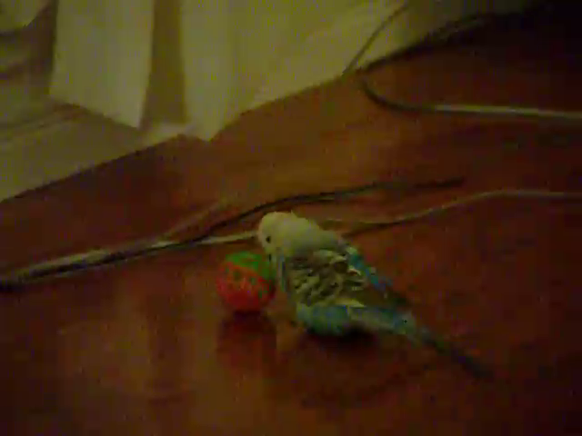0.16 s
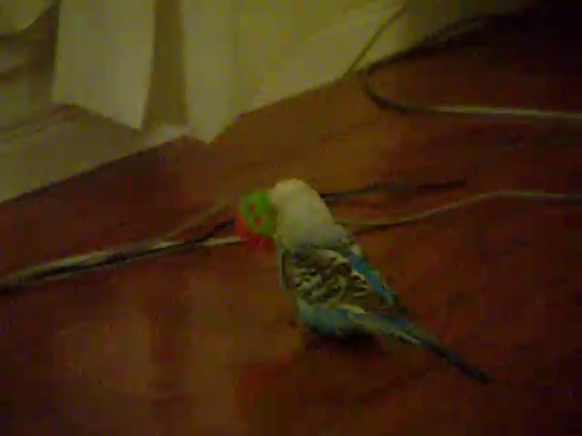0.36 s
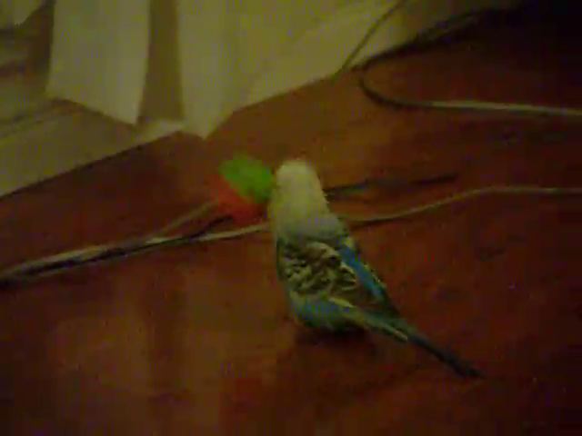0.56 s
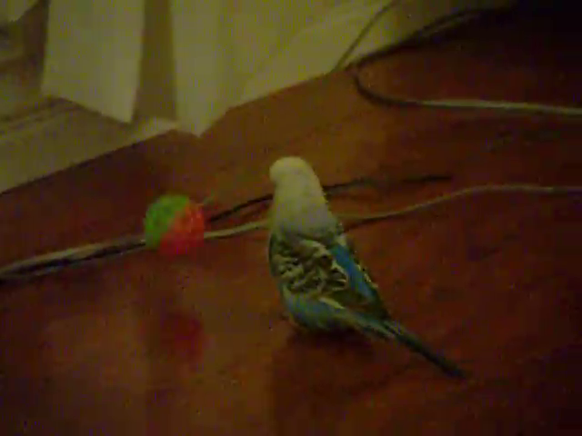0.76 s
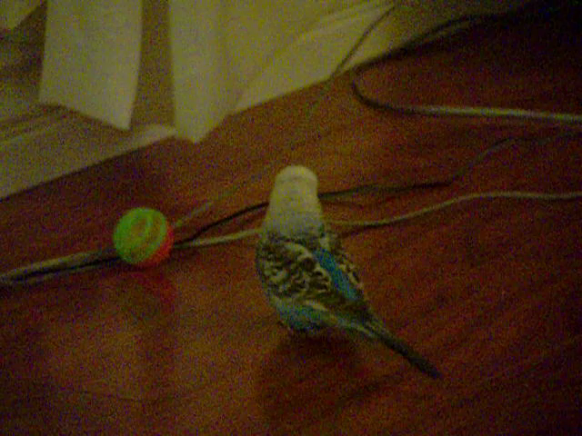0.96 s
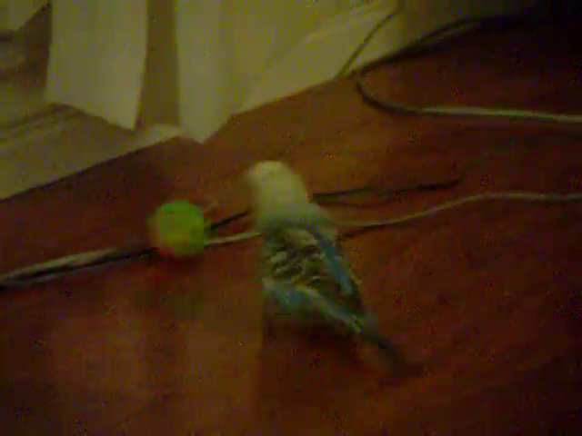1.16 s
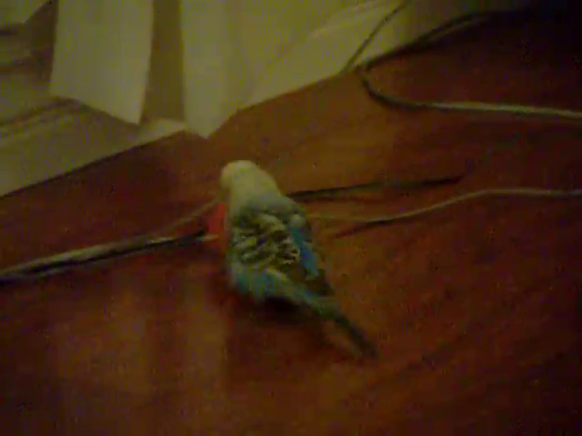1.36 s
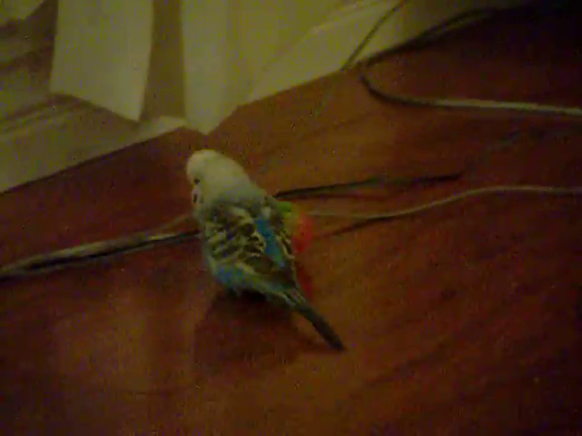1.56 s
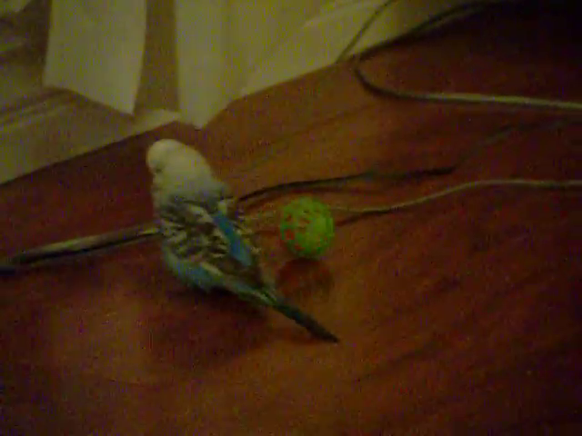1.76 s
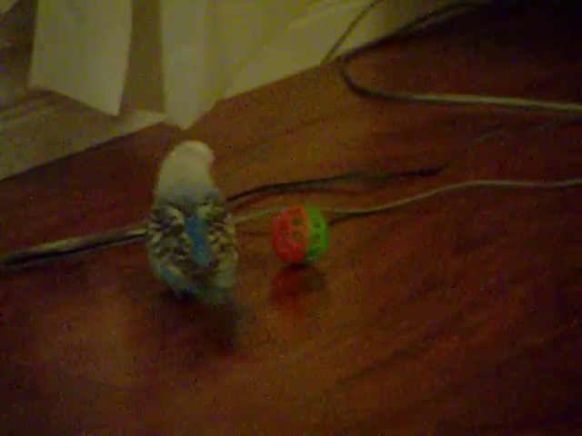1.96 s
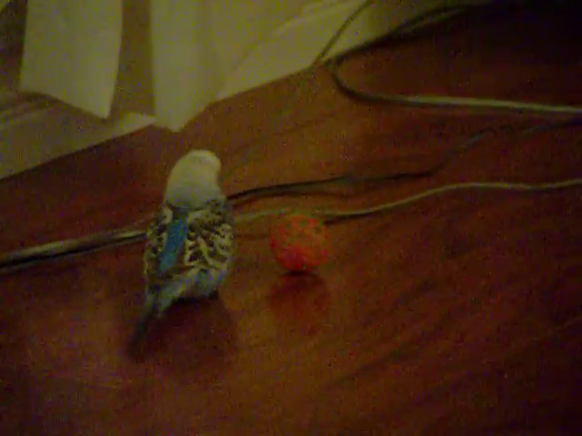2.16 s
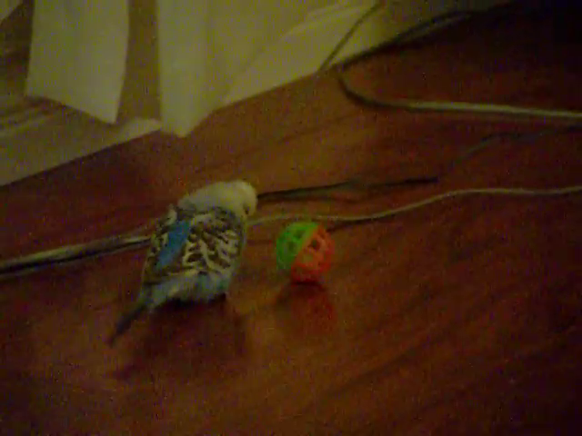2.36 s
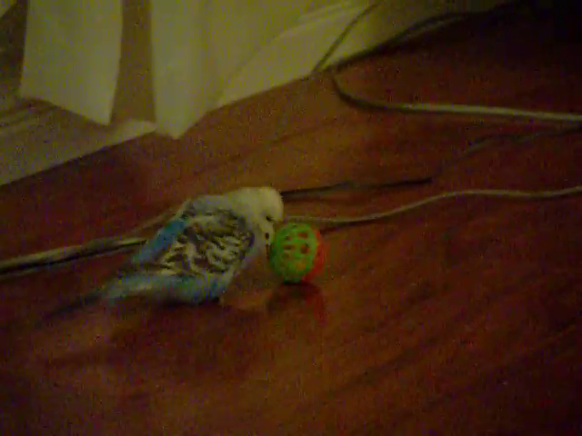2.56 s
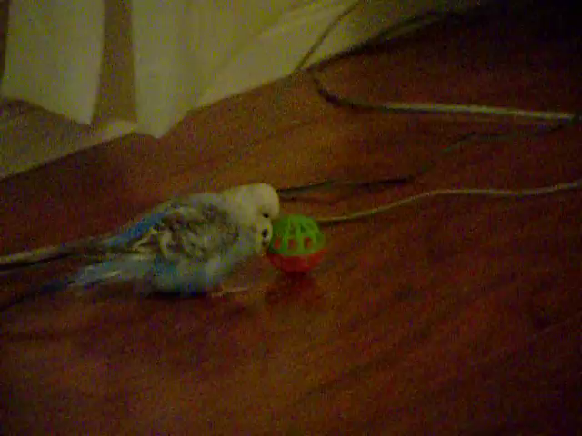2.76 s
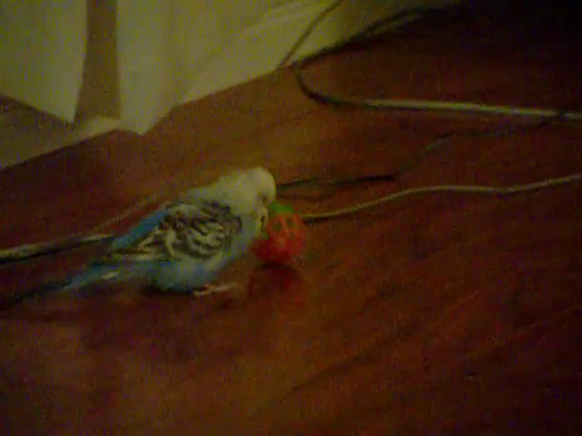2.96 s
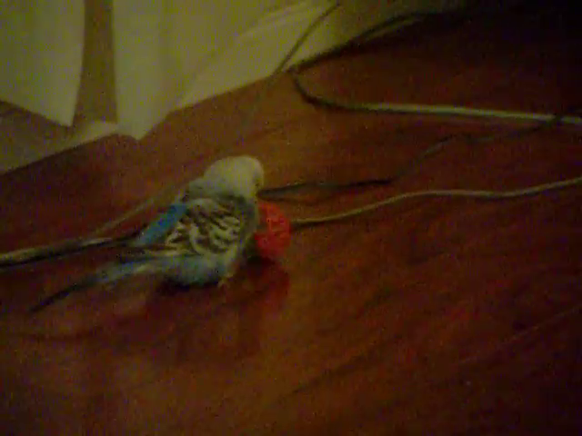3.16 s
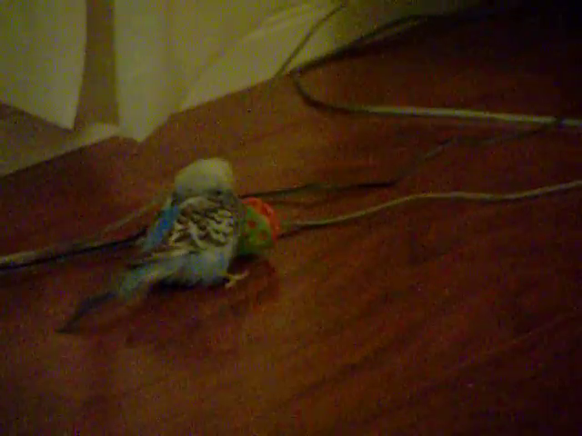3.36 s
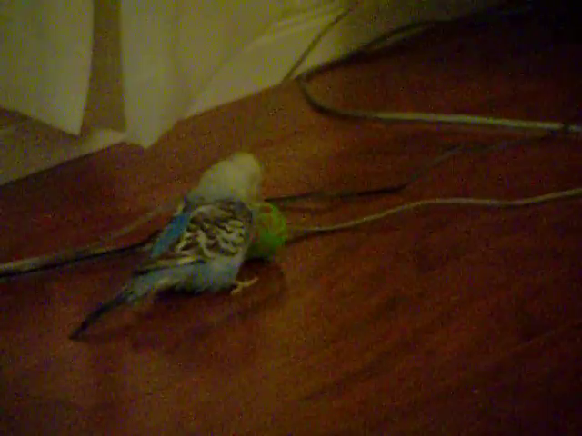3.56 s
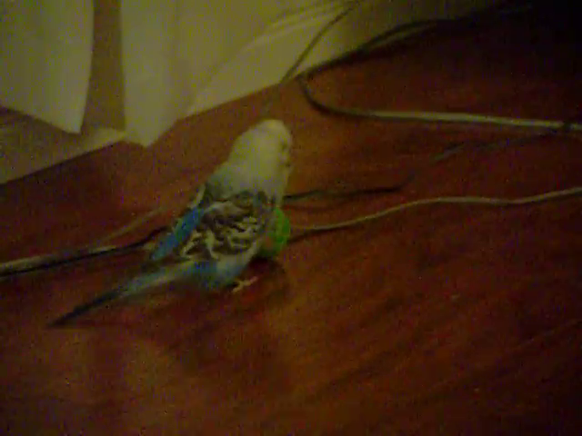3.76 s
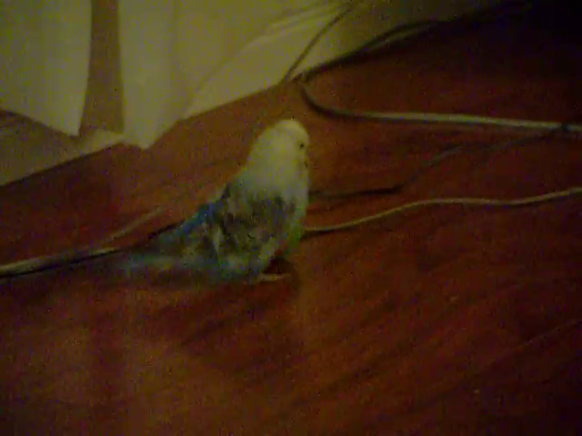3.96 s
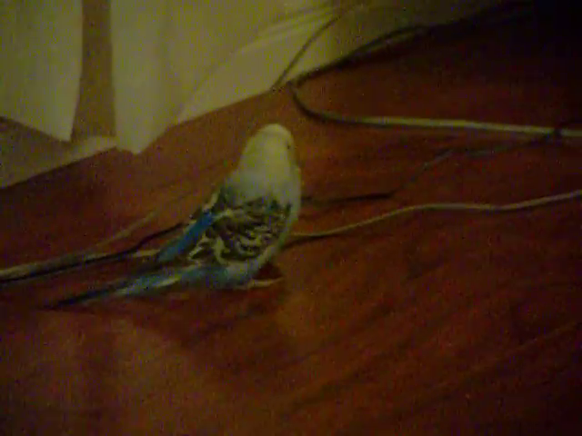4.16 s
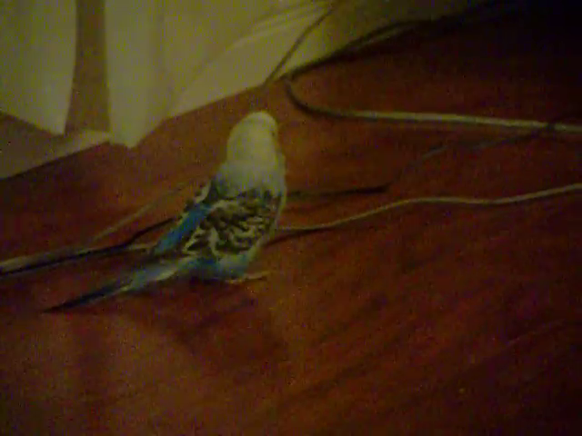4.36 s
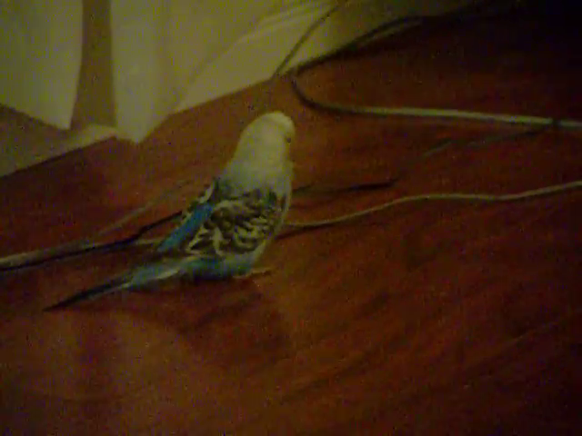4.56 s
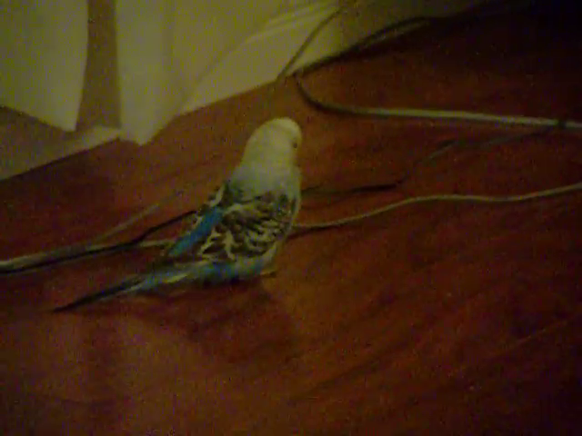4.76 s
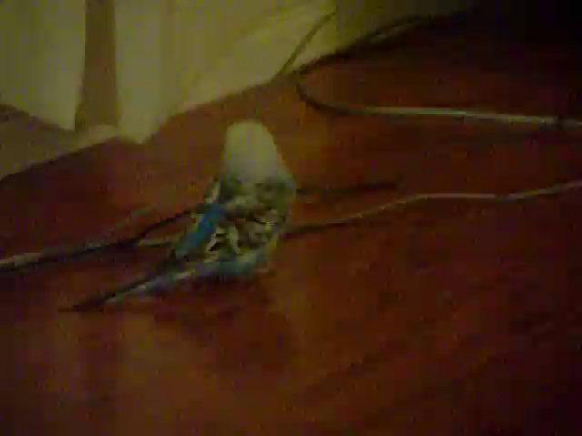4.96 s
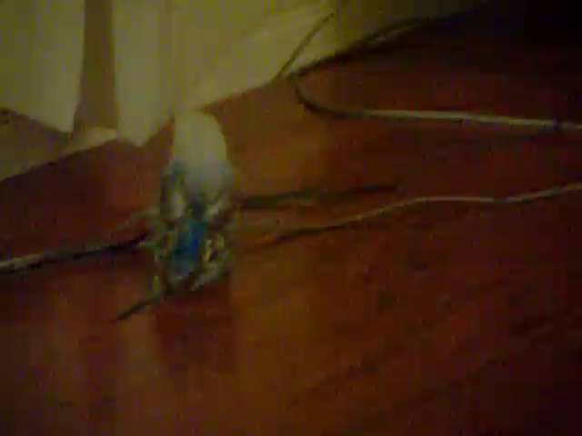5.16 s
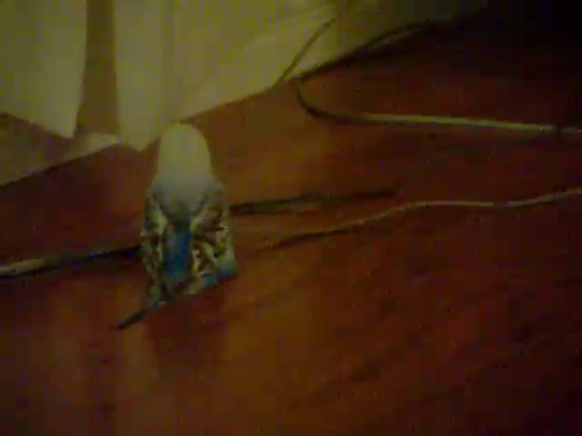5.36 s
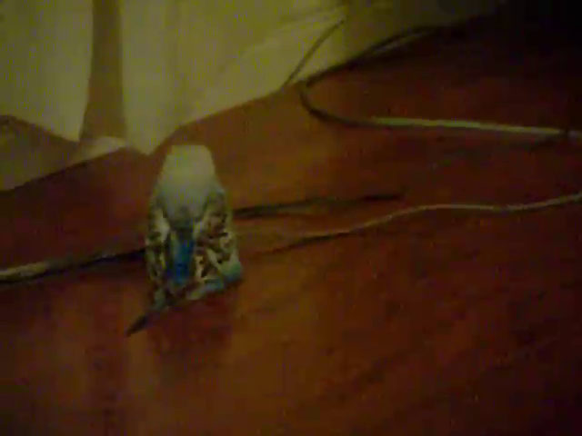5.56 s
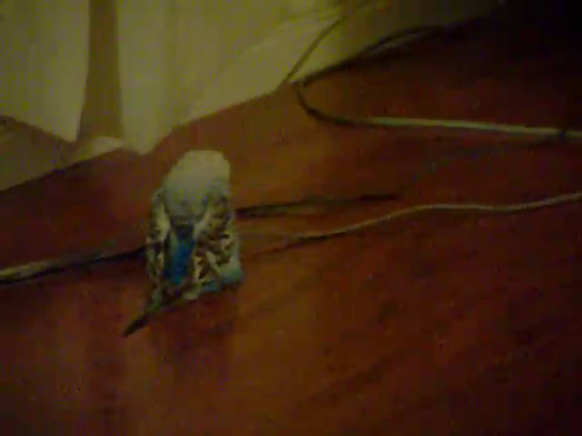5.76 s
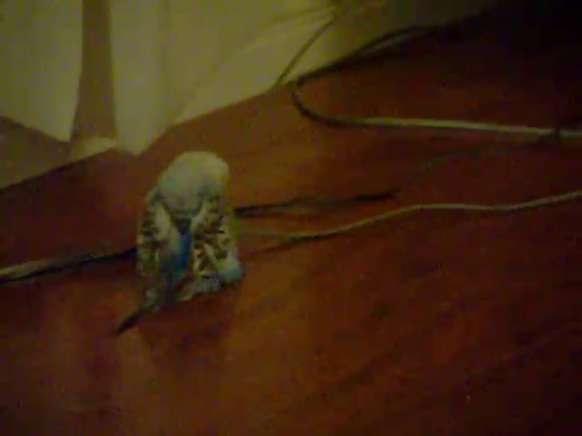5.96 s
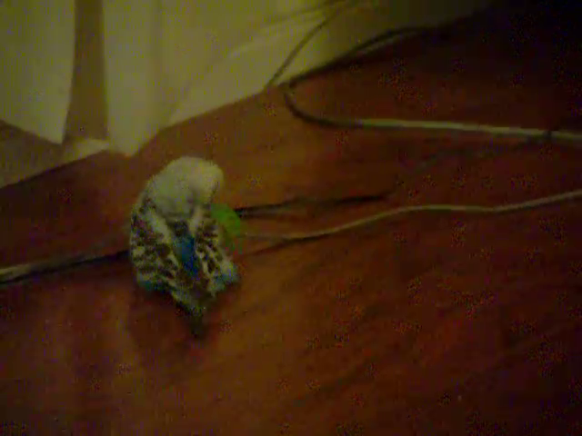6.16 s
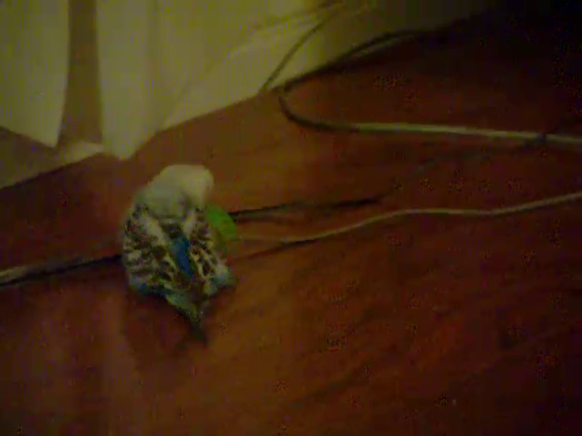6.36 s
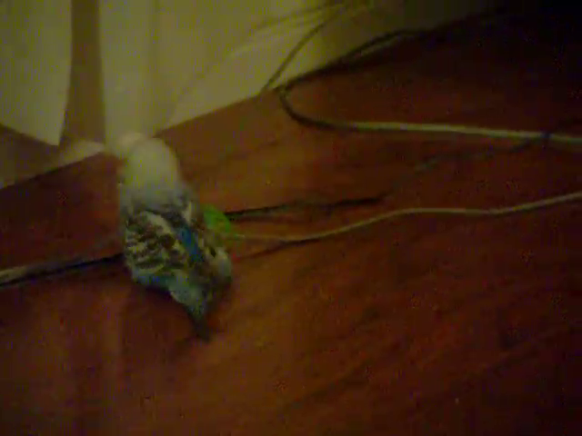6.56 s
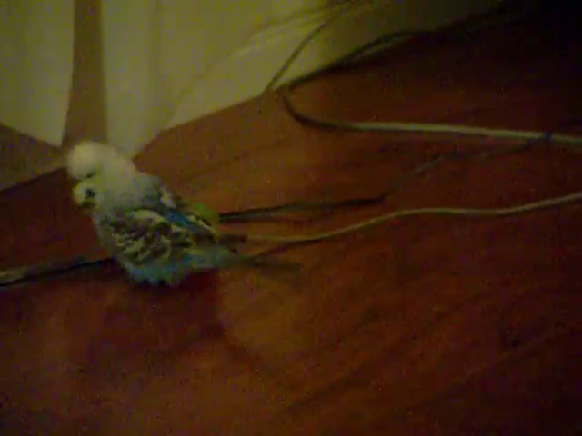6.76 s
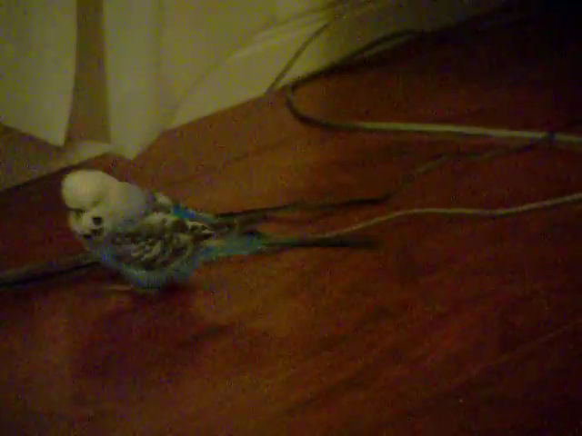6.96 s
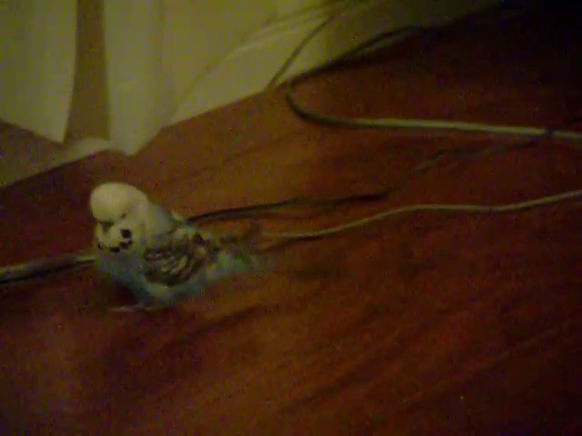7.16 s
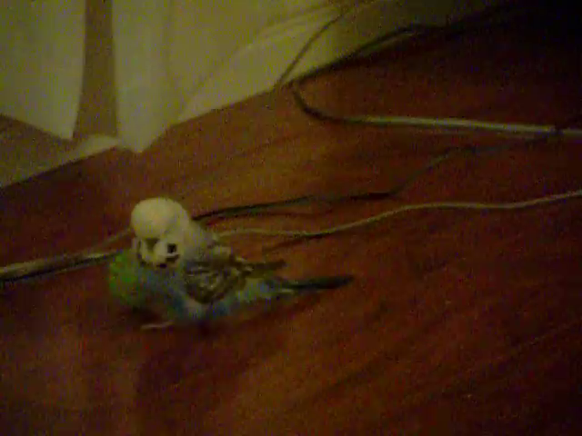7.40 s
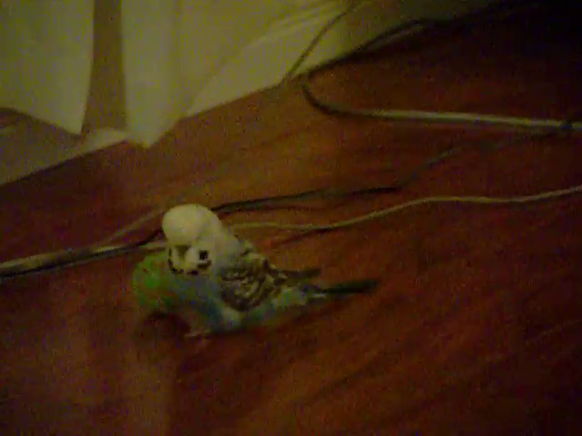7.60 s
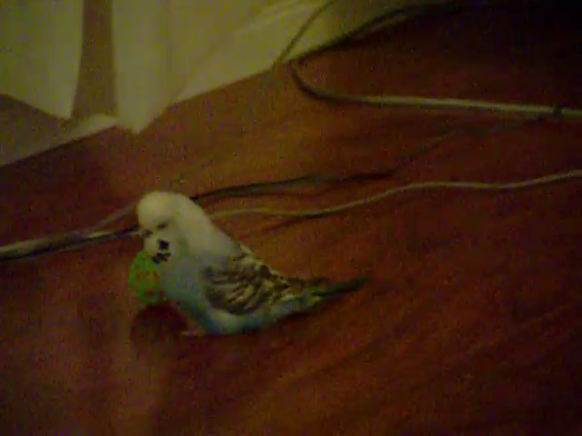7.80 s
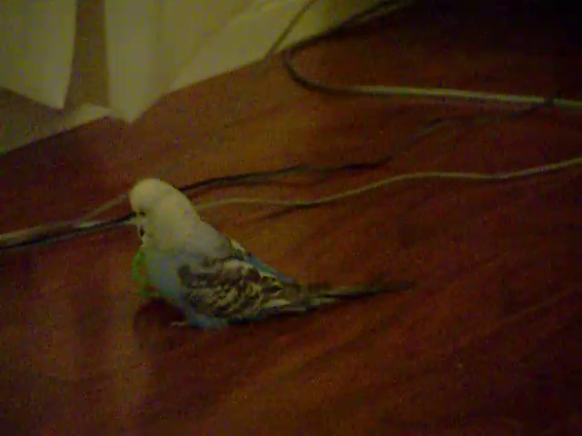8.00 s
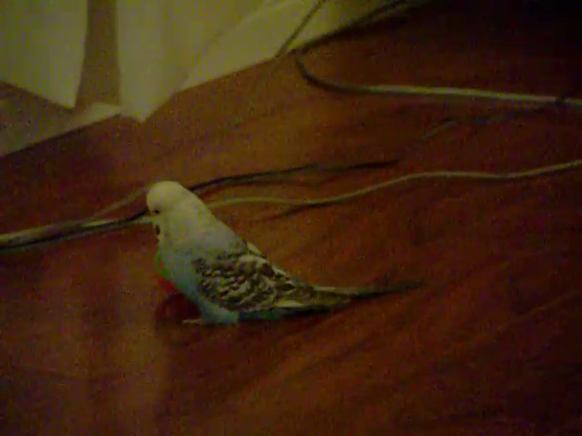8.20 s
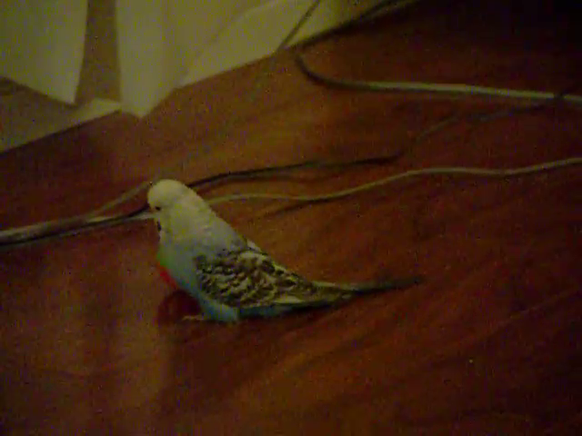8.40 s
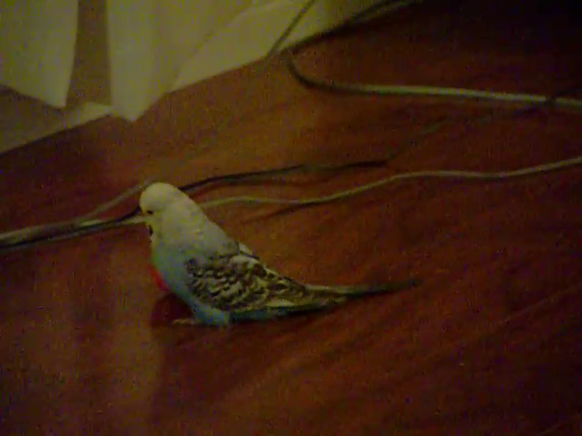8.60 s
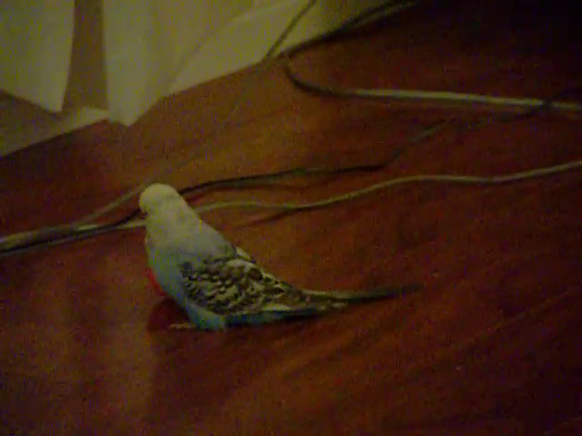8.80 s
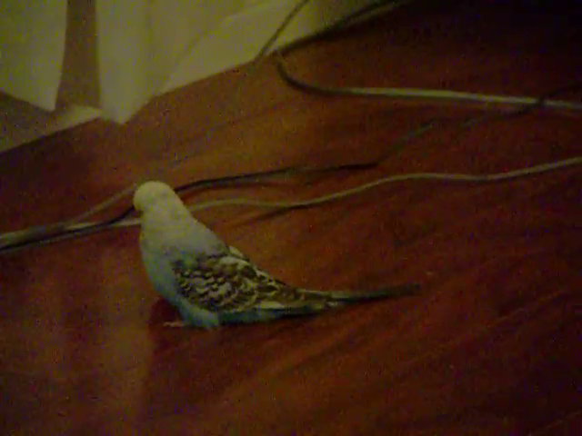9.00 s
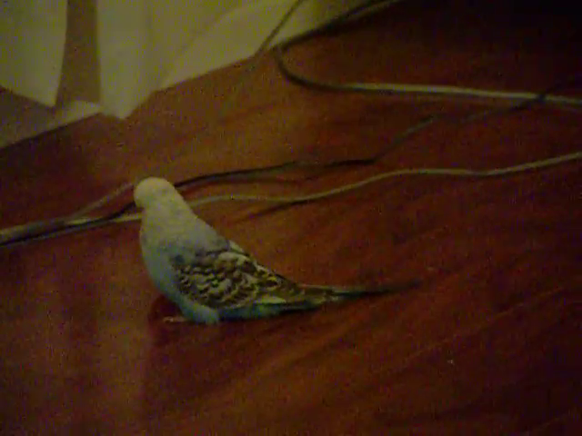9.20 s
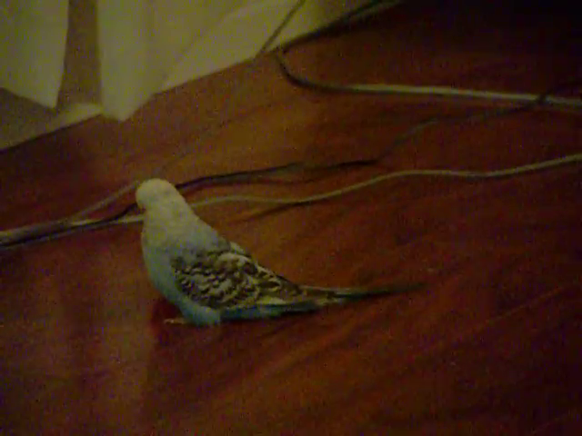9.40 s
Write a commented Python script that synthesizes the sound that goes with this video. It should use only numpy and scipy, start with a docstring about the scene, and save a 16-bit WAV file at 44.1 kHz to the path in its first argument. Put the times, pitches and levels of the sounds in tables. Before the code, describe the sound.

A steady muffled hiss and faint thin whine lie under a small hard-floored room. From 0.2 s, dry beak clicks come, with a quick high chirp at 0.35. At 0.77 a plastic ball lands with a hard wooden knock and its little bell jingles brightly, rolling and ticking until 1.6. Faint tiny warbles follow to 1.95, then scattered taps and soft scuffles. Just before 3 s a short squawk slides down and cracks into roughness; a strong sharp tap follows at 3.2. Low rasps and weak jingles run from 3.5 to 5.8 with light clicks. At 5.9 a piercing, distorted whistle bursts for a tenth of a second, with a thump, and the background ducks briefly. From 6.8 to 8.3 the bell jingles busily among clicks, a soft note at 7.5, and bright taps near 7.95. Afterwards only faint rasps, two taps, a scuffle and a low drone swelling until about 9.4.

```python
"""A small bell jingles in a ball rolling over a wooden floor, while a budgerigar warbles, squawks and whistles loudly.
The bell rings when the slotted plastic ball moves; clicks of the beak and taps of the ball knock the floorboard.
The bird's notes are overtones shaped by its throat. A nearby skirting board and a room tail answer bird and ball.
A small camera adds hiss and a thin whine, and its gain control ducks after loud sounds; a low drone swells at the end."""
import sys
import numpy as np
from scipy import signal
from scipy.fft import rfft, irfft, next_fast_len
from scipy.io import wavfile
from scipy.ndimage import uniform_filter1d, minimum_filter1d, map_coordinates

SR = 44100
rng = np.random.default_rng(int(sys.argv[2]) if len(sys.argv) > 2 else 0)


def master(y):
    """Save y as 16-bit WAV."""
    cut = np.clip(np.atleast_2d(y).T, -1, 1)
    pcm = np.round(cut * 32767)  # scale
    wavfile.write(sys.argv[1], SR, pcm.astype(np.int16))


def elevation(decibels):
    """Turn decibel levels (scalar or array-like) into linear amplitude ratios."""
    levels = np.asarray(decibels, float)
    return 10 ** (levels / 20)


N = 416304
T = np.arange(N) / SR

# ringing modes of the bell, the first six low, the rest high: (pitch [Hz], width [Hz], relative level [dB])
BELL = [(2930, 50, -1), (3465, 45, 0), (4160, 45, -2), (4290, 35, -2), (4650, 50, -2), (5250, 50, -5),
        (5870, 50, -14), (6220, 60, -12), (7545, 45, 0), (7925, 50, -3), (8070, 40, -3), (8450, 45, 0)]
LOW_MODES, HIGH_MODES = BELL[:6], BELL[6:]


def unit(x):
    """Scales a sound to rms 1."""
    return x / np.sqrt(np.mean(x ** 2) + 1e-20)


def along(points, hz):
    """Reads a curve of (Hz, value) points on a log frequency axis."""
    f, v = np.transpose(points)
    return np.interp(np.log(hz + 1), np.log(f + 1), v)


def wobble(rate, size):
    """A smooth random curve with rate knots a second."""
    knots = rng.standard_normal(int(size * rate / SR) + 4)
    return map_coordinates(knots, [np.arange(size) * rate / SR])


def filtered(x, response):
    """Multiplies the spectrum of x by a complex response of frequency."""
    m = next_fast_len(len(x) + 8192)
    spectrum = rfft(x, m) * response(np.fft.rfftfreq(m, 1 / SR))
    return irfft(spectrum, m)[:len(x)]


def mode(hz, width_hz):
    """Response of one resonance: strongest at hz, falling away on both sides."""
    return lambda f: 1j * f * width_hz / (hz * hz - f * f + 1j * f * width_hz)


def fade_60_db(t, seconds):
    """An even fade in dB, as in a freely ringing body: 60 dB in the given seconds."""
    return elevation(-60 * t / seconds)


def add(track, s, sound):
    """Mixes a sound in at time s."""
    part = track[round(s * SR):][:len(sound)]
    part += sound[:len(part)]


def hiss():
    """Steady noise of the camera, coloured by a curve with a narrow notch near the top."""
    # colour of the hiss: (frequency [Hz], relative level [dB])
    hiss_curve = [(13, -26.5), (22, 2), (64, 1.5), (457, -12), (797, -15.5), (881, -16.5), (975, -16),
                  (1050, -14), (1320, -17.5), (4120, -23), (4920, -23.5), (6170, -24.5), (7750, -23.5),
                  (8570, -37.5), (9250, -74.5), (12000, -100), (20400, -120)]
    colour = lambda f: elevation(along(hiss_curve, f)) * (1 - .8 * mode(8050, 350)(f))
    return elevation(-49) * unit(filtered(rng.standard_normal(N), colour))


def whine():
    """Thin steady tones of the camera, each wavering slightly in level and phase."""
    # (pitch [Hz], level [dB])
    whine_tones = [(963.6, -60), (2503, -78.5), (4818, -72.5), (4856, -72)]
    out = np.zeros(N)
    for hz, db in whine_tones:
        level = elevation(db + 1.8 * wobble(12, size=N))
        out += level * np.sin(2 * np.pi * hz * T + 0.56 * wobble(4.4, size=N))
    return out


def drone():
    """A low wavering tone that swells near the end."""
    # swell of the drone: (time [s], level [dB])
    swell = [(6.0, -73), (6.48, -75), (6.68, -54.5), (7.72, -58.5), (8.53, -43.5), (8.81, -47),
             (9.44, -39.5)]
    level = elevation(np.interp(T, *np.transpose(swell)) + 1.5 * wobble(25, size=N))
    return level * np.sin(2 * np.pi * 87 * T + 0.39 * wobble(7.7, size=N))


def room(x):
    """A skirting board echoes after 6 ms; a noise tail dies away, redrawn every quarter second."""
    # how long the tail lasts: (frequency [Hz], time to fall 60 dB [s])
    decay_times = [(300, 0.33), (3000, 0.35), (8000, 0.28)]
    out, hop = np.zeros(N), SR // 4
    fade = np.hanning(2 * hop + 1)[:-1]  # neighbouring pieces overlap
    padded = np.pad(x, (hop, 2 * hop))
    for start in range(0, N + hop, hop):
        hz, t, z = signal.stft(rng.standard_normal(SR // 2), SR, nperseg=256)
        dying = z * fade_60_db(t, along(decay_times, hz)[:, None])
        tail = signal.istft(dying, SR, nperseg=256)[1]
        piece = padded[start:start + 2 * hop] * fade
        wet = signal.fftconvolve(piece, tail / np.linalg.norm(tail))
        add(out, max(start - hop, 0) / SR + .007, wet[max(hop - start, 0):])
    add(out, .006, elevation(-9.5) * x)
    return out


def board(f):
    """Response of the floorboard: a few broad resonances with alternating sign."""
    # (pitch [Hz], width [Hz], level [dB])
    board_modes = [(175, 64, 2), (420, 96, 0), (650, 480, 2.5), (1190, 1270, 0.5)]
    return sum((-1) ** k * elevation(db) * mode(hz, width)(f) for k, (hz, width, db) in enumerate(board_modes))


def taps():
    """Beak clicks and ball taps: a short ring, a bright crack and a board knock, set apart for landings."""
    # clicks and taps: (time [s], level [dB], ring pitch [Hz], crack level over the tap [dB])
    tap_list = [(.168, -30.5, 3840, -16), (0.1844, -33.5, 3770, -26), (0.211, -36.5, 3280, -6.5),
                (0.3267, -28.5, 4640, -19), (0.4367, -29, 4930, -24), (0.5228, -24.5, 4800, -1),
                (.5394, -25.5, 4550, -26), (.7721, -17, 4830, -10), (0.8992, -23.5, 3000, -8),
                (1.0897, -26, 5200, -6), (1.222, -30.5, 2800, 3.5), (1.2836, -28, 2190, 0),
                (1.4171, -27.5, 3480, -20), (1.489, -34, 5030, -18), (1.577, -39, 4260, -4),
                (1.9768, -29, 4600, -12), (2.043, -24, 2630, 1), (2.4197, -32, 2910, -15),
                (2.5898, -28.5, 4960, -6), (2.756, -34, 5050, 7.5), (2.7908, -26, 2470, 8),
                (3.2213, -15, 4000, -11.5), (3.7073, -43.5, 4160, 8.5), (4.0523, -34.5, 4250, -16),
                (4.4187, -34, 4750, 0), (4.974, -43, 6560, 8), (5.072, -37.5, 5470, 5.5),
                (5.1833, -34.5, 2730, -15), (5.303, -31.5, 4760, -10), (5.603, -41, 4600, -8.5),
                (5.6305, -31.5, 2770, -15), (6.159, -36, 2930, 0), (6.6505, -35, 2080, -20),
                (6.8851, -27.5, 3320, -19), (6.9632, -28, 2900, -20), (7.1656, -27, 3000, -15),
                (7.573, -28, 3030, -19), (7.7452, -28.5, 3440, 6), (7.832, -30, 5400, -12),
                (7.9421, -25.5, 6530, 11.5), (7.9692, -24, 6400, -4), (8.8066, -35, 4540, -10),
                (9.2362, -32, 4600, 3)]
    # the ball comes down on the boards: (time [s], blow level [dB])
    landing_list = [(0.5399, -27.5), (0.7717, -8), (.9012, -16.5), (1.222, -26), (2.4182, -27),
                    (2.5885, -32), (2.756, -28), (5.028, -27.5), (5.3039, -43), (8.8062, -29)]
    tap_in_board_db = -13  # share of every tap that reaches the floor
    out, blows, t = np.zeros(N), np.zeros(N), np.arange(SR // 50) / SR
    rise = 1 - np.exp(-t / .0009)
    for s, db, hz, crack_db in tap_list:
        noise = rng.standard_normal((2, len(t))) * rise
        ring = 0.81 * np.sin(2 * np.pi * hz * t) * fade_60_db(t, 0.011) * rise
        body = 1.15 * filtered(noise[0] * fade_60_db(t, 0.04), lambda f: mode(hz, 1900)(f) ** 2)
        crack = elevation(crack_db) * filtered(noise[1] * fade_60_db(t, 0.022), mode(4300, 3400))
        add(out, s, elevation(db) * (ring + body + crack))
    tap_blows = [(s, db + tap_in_board_db) for s, db, *_ in tap_list]
    for s, db in landing_list + tap_blows:
        add(blows, s, elevation(db) * rng.standard_normal(len(t)) * rise * fade_60_db(t, 0.021))
    return out + filtered(blows, board)


def ball_layers():
    """Levels of high ring, low ring, tick and rumble follow the ball's motion; scuffles add to the rumble."""
    # how briskly the ball moves, one table for each spell: (time [s], jingle level [dB])
    spells = [
        [(0.45, -63), (0.518, -57.5), (0.762, -78), (0.774, -35.5), (0.846, -35.5), (1.188, -51.5),
         (1.338, -47), (1.482, -58.5), (1.492, -56), (1.62, -68)],
        [(3.86, -79), (3.884, -78), (3.898, -60), (4.102, -60.5), (4.106, -59), (4.198, -58), (4.316, -64),
         (4.454, -59), (4.712, -82), (4.78, -87)],
        [(4.82, -68), (4.862, -62), (4.918, -72), (4.972, -58.5), (5.488, -58), (5.618, -71), (5.628, -49.5),
         (5.73, -70.5), (5.738, -61.5), (5.8, -69)],
        [(6.76, -88), (6.818, -58.5), (6.968, -55), (6.978, -45), (7.026, -58.5), (7.186, -49.5),
         (7.316, -52.5), (7.994, -48.5), (8.34, -54.5), (8.5, -79)],
    ]
    # soft scuffles on the boards, perhaps claws or feathers: (time [s], length [s], level [dB])
    scuffle_list = [(0.524, 0.16, -63), (1.65, .22, -65.5), (1.997, 0.14, -64), (2.551, 0.16, -51),
                    (2.777, 0.24, -59), (3.448, 0.075, -57), (3.761, 0.13, -60.5), (5.176, 0.14, -65.5),
                    (5.498, 0.052, -61.5), (5.65, 0.52, -64.5), (9.202, 0.26, -56.5)]
    reference_db = -55
    # high ring, low ring, tick, rumble: (level over the jingle at the reference [dB], dB per dB of motion)
    layers = (2.2, 0.93), (-8.5, 1.22), (-3, 1), (-6, 0.86)
    # the ball falls still between spells
    points = [[(rows[0][0] - .05, -100), *rows, (rows[-1][0] + .02, -100)] for rows in spells]
    s, db = np.concatenate(points).T
    motion_db = np.interp(T, s, db) - reference_db
    high, low, tick, roll = [elevation(reference_db + over_db + slope * motion_db) for over_db, slope in layers]
    for s, length, db in scuffle_list:
        add(roll, s, elevation(db) * signal.windows.tukey(int(length * SR), .4))
    return high, low, tick, roll


def moving_ball():
    """Random contacts ring the bell modes and tick on the shell; slots and scuffles rumble on the boards."""
    # tick of the bell on the shell: (frequency [Hz], level [dB])
    shell_curve = [(1500, -37.5), (2500, -20.5), (4500, 5.5), (6500, 6.5), (9000, -11.5)]
    count = 1500  # contacts, at random times
    when = rng.integers(0, N, count)
    size_db = np.minimum(3 * rng.exponential(size=count), 9)

    def strike(share=1):
        """Impulses of either sign at a random share of the contacts."""
        sizes = elevation(size_db + 4.9 * rng.standard_normal(count))
        signs = rng.choice([-1, 0, 1], count, p=[share / 2, 1 - share, share / 2])
        return np.bincount(when, sizes * signs, N)

    def ring(modes):
        """Each mode catches about one contact in three, at strengths of its own."""
        parts = [elevation(db) * unit(filtered(strike(1 / 3), mode(hz, width))) for hz, width, db in modes]
        return unit(sum(parts))

    scrape = rng.standard_normal(400) * fade_60_db(np.arange(400) / SR, .009)
    scrapes = signal.fftconvolve(strike(2 / 3), scrape)[:N]
    tick = unit(filtered(scrapes, lambda f: elevation(along(shell_curve, f))))
    contact = strike() + 0.58 * rng.standard_normal(N)
    rumble = unit(filtered(contact, lambda f: board(f) + 0.71 * mode(2200, 2000)(f)))
    high_level, low_level, tick_level, roll_level = ball_layers()
    jingle = high_level * ring(HIGH_MODES) + low_level * ring(LOW_MODES)
    return jingle + tick_level * tick + roll_level * rumble


def bell_strokes():
    """Clear single strokes: each mode rings as a dying tone, the wider the mode the sooner it dies."""
    # (time [s], level of the high modes [dB], low modes over the high [dB])
    stroke_list = [(0.777, -33.5, 6.5), (.8328, -38.5, -15), (0.858, -39.5, -23), (0.9107, -34, -7.5),
                   (0.9931, -37, -4.5), (1.022, -39.5, -4.5), (1.0927, -45, -31), (1.226, -47.5, -10),
                   (1.287, -37.5, -18), (1.3308, -38.5, -12.5), (1.4898, -37.5, -21), (4.065, -41, -14),
                   (4.0956, -44.5, -13.5), (4.4267, -43.5, -9.5), (4.4787, -44, -9), (4.8458, -55.5, -24),
                   (5.0634, -48, -4), (5.4278, -46, -20), (6.886, -51.5, 5.5), (6.9727, -38.5, -14.5),
                   (7.0776, -48, 8.5), (7.1012, -39, -3), (7.1456, -35, -10), (7.1674, -31, -21.5),
                   (7.2325, -31.5, -10), (7.3016, -51, 4.5), (7.5033, -45, -32), (7.574, -38, -22.5),
                   (7.6452, -37.5, -13), (7.709, -47.5, 2), (7.832, -38.5, -28.5), (7.938, -37.5, -20.5),
                   (8.0367, -39.5, -6), (8.08, -43.5, -21)]
    out, t = np.zeros(N), np.arange(SR // 8) / SR

    def stroke(modes):
        """One stroke, with a random strength for each mode."""
        return sum(elevation(db + rng.normal(0, 3)) * np.exp(-np.pi * width * t) * np.sin(2 * np.pi * hz * t)
                   for hz, width, db in modes)

    for s, db, low_db in stroke_list:
        add(out, s, elevation(db) * (stroke(HIGH_MODES) + elevation(low_db) * stroke(LOW_MODES)))
    return out


def voice(rows, width_hz):
    """Overtones of the bird's voice organ, weighted by its throat; roughness shakes pitch and size."""
    # rows: (time [s], pitch [Hz], level [dB], throat resonance [Hz], roughness)
    s, *columns = np.transpose(rows)
    t = s[0] + np.arange(int((s[-1] - s[0]) * SR)) / SR
    hz, db, throat, rough = [np.interp(t, s, column) for column in columns]
    shaken_hz = hz * (1 + .12 * rough * wobble(602.6, size=len(t)))
    phase = 2 * np.pi * np.cumsum(shaken_hz) / SR
    k = np.arange(1, 10)[:, None]  # overtone numbers
    weight = 1 / (1 + ((k * hz - throat) / width_hz) ** 2) + 0.012
    weight = weight * (k * hz < SR / 4)
    weight = weight / (1 + (1100 / (k * hz)) ** 4)  # a small body sends out little bass
    tone = np.sum(weight * np.sin(k * phase), axis=0)
    tone = tone / np.sqrt(np.sum(weight ** 2, axis=0) / 2)  # even loudness
    return elevation(db) * tone * (1 + 2 * rough * wobble(900, size=len(t)))


def short_notes():
    """Higher, slightly rough notes with the throat tuned to the pitch, and low rasps; all swell and fade."""
    # higher notes: (time [s], length [s], first pitch [Hz], last pitch [Hz], level [dB])
    note_list = [(.09, 0.035, 2560, 2520, -59.5), (0.095, 0.017, 2830, 3300, -56),
                 (0.123, 0.013, 3050, 3250, -58), (0.483, 0.012, 1800, 1910, -57),
                 (1.66, 0.0095, 3630, 3700, -52.5), (1.7, .013, 2740, 2660, -51),
                 (1.755, .022, 3400, 4220, -56), (1.78, 0.018, 3580, 3400, -54),
                 (1.83, 0.017, 3550, 3420, -58), (1.794, .024, 2580, 2650, -54.5),
                 (1.866, .033, 2475, 2450, -60), (1.946, 0.021, 2710, 2650, -57),
                 (2.612, 0.016, 2220, 2190, -46), (2.805, 0.045, 2160, 2450, -52.5),
                 (3.471, 0.012, 2320, 2330, -53), (4.832, 0.01, 2320, 2130, -52.5),
                 (5.062, .02, 2690, 2630, -56), (5.207, .025, 2680, 3440, -56),
                 (5.23, 0.009, 2230, 2100, -52), (5.278, 0.016, 2700, 2190, -46.5),
                 (5.325, 0.017, 2290, 2380, -58), (5.43, .032, 2607, 2570, -59.5),
                 (5.48, 0.0093, 3530, 3480, -49), (5.809, 0.066, 2915, 3080, -59),
                 (5.836, 0.015, 4300, 4250, -55), (6.852, 0.037, 1716, 1750, -59),
                 (7.428, 0.024, 1930, 2016, -57), (7.53, 0.11, 3030, 3044, -54)]
    # rasps on a steady pitch: (time [s], length [s], pitch [Hz], throat resonance [Hz], level [dB])
    rasp_list = [(2.571, 0.058, 990, 4670, -46), (3.359, 0.041, 1080, 2300, -53),
                 (3.505, 0.01, 1486, 3000, -49), (3.771, .02, 954, 2720, -45),
                 (3.804, .012, 930, 2900, -51.5), (3.839, 0.016, 1032, 2080, -54),
                 (4.496, 0.015, 1110, 2300, -51), (5.646, 0.025, 850, 2400, -49.5),
                 (7.147, 0.073, 1010, 2180, -52.5), (7.377, 0.028, 979, 1950, -49),
                 (8.652, 0.021, 908, 1980, -56), (8.697, .02, 818, 1860, -53.5)]
    note_rough, rasp_rough = .3, .33
    out = np.zeros(N)
    short = [(s, length, hz, last, (hz + last) / 2, db, note_rough) for s, length, hz, last, db in note_list]
    short += [(s, length, hz, hz, throat, db, rasp_rough) for s, length, hz, throat, db in rasp_list]
    for s, length, hz, last_hz, throat, db, rough in short:
        first_row = (s, hz, db, throat, rough)
        last_row = (s + length, last_hz, db, throat, rough)
        note = voice([first_row, last_row], width_hz=1200)
        add(out, s, note * signal.windows.tukey(len(note), .5))
    return out


def squawk():
    """The voice slides down, breaks to about half its pitch and sags, rougher as it gets lower."""
    # (time [s], pitch [Hz], level [dB])
    squawk_rows = [(2.97, 2620, -52.5), (2.976, 2260, -37.5), (2.982, 1972, -24.5), (2.986, 2012, -40.5),
                   (2.986, 1061, -34.5), (2.996, 1014, -35), (3.006, 977, -38.5), (3.02, 933, -26),
                   (3.026, 890, -37.5), (3.041, 905, -40)]
    throat_hz, clear_above_hz, rough_per_hz = 3900, 1100, 0.0041
    rough = lambda hz: np.clip((clear_above_hz - hz) * rough_per_hz, .05, 1)
    rows = [(s, hz, db, throat_hz, rough(hz)) for s, hz, db in squawk_rows]
    out = np.zeros(N)
    add(out, squawk_rows[0][0], voice(rows, width_hz=1210))
    return out


def whistles():
    """Clear tones, throat tuned to the pitch, over a noise skirt and low thump from the overloaded camera."""
    # a chirp, a peep, then the loud whistle, one table each: (time [s], pitch [Hz], level [dB])
    whistle_list = [
        [(.326, 4200, -60.5), (.332, 4510, -45.5), (.343, 4770, -35), (.357, 4650, -36.5), (.38, 4520, -56),
         (.405, 3790, -50.5), (.412, 3600, -69)],
        [(2.953, 2920, -64), (2.957, 2840, -41), (2.97, 2870, -45.5), (2.974, 2670, -57)],
        [(5.876, 5340, -69), (5.883, 4970, -34), (5.891, 5350, -30.5), (5.9, 5575, -11), (5.917, 5650, -8),
         (5.95, 5513, -12.5), (5.965, 5465, -16.5), (5.98, 5460, -17.5), (5.992, 5650, -50)],
    ]
    roughness, skirt_db, thump_db = .04, -33.5, -26  # levels against the whistle's size
    out = np.zeros(N)
    for rows in whistle_list:
        tone = voice([(s, hz, db, hz, roughness) for s, hz, db in rows], width_hz=1130)
        skirt = unit(filtered(rng.standard_normal(len(tone)), mode(4200, 1600)))
        thump = unit(filtered(rng.standard_normal(len(tone)), mode(200, 190)))
        size = uniform_filter1d(np.abs(tone), 200)  # skirt and thump follow the whistle's size
        add(out, rows[0][0], tone + size * (elevation(skirt_db) * skirt + elevation(thump_db) * thump))
    return out


def microphone(x):
    """Passes the band of the microphone, which ends steeply in the treble."""
    # top of the band: (frequency [Hz], level [dB])
    band_top = [(7500, 0), (8200, -4.5), (8600, -22), (9000, -26), (9400, -77)]
    return filtered(x, lambda f: elevation(along(band_top, f)))


def scene():
    """Bird and ball in the room, heard by the microphone, over hiss, whine and drone."""
    near = taps() + moving_ball() + bell_strokes() + short_notes() + squawk() + whistles()
    heard = elevation(-0.5) * near + elevation(-0.5) * room(near)
    return (microphone(heard) + hiss() + whine() + drone())[None]


def band_limit(x):
    """A steep low-pass at the top of the band."""
    return signal.sosfilt(signal.butter(12, 9400, fs=SR, output="sos"), x)


def record(dry):
    """Gain control ducks all but the bass, holds and comes back; the amplifier bends loud sound lopsidedly."""
    level = np.sqrt(np.abs(uniform_filter1d(dry[0] ** 2, 1500)))
    need = np.minimum(1, 0.038 / (level + 1e-9)) ** 0.27  # the louder, the more gain is taken off
    hold, back = int(.65 * SR), int(.2 * SR)  # .65 s held, .2 s to come back
    held = minimum_filter1d(need, hold, origin=(hold - 1) // 2)
    gain = np.minimum(held, uniform_filter1d(held, back, origin=(back - 1) // 2))
    bass = filtered(dry[0], lambda f: 1 / (1 + (f / 150) ** 2))
    x = bass + gain * (dry[0] - bass)
    x = x / (1 + np.abs(x / .2) ** 6) ** (1 / 6)  # soft ceiling
    x = x + 30 * x ** 4  # lopsided near the top
    # sampled at half the rate: the whistle's fourth overtone folds down to a low thump
    x = x * (np.arange(N) % 2) * 2
    x = filtered(x, lambda f: (f > 15) / (1 + (f / 9000) ** 120))
    return band_limit(x[None])


dry = scene()
out = record(dry)
master(out)
```